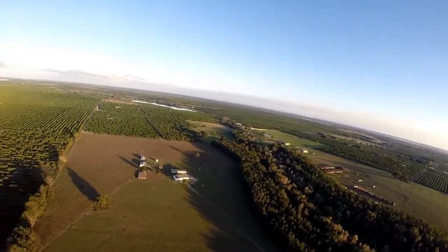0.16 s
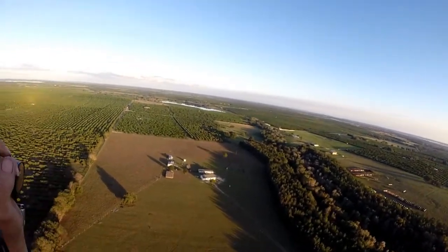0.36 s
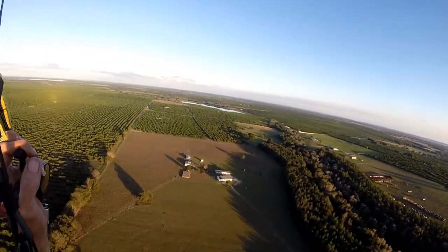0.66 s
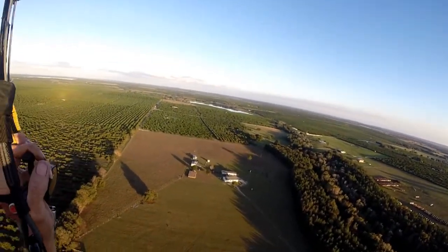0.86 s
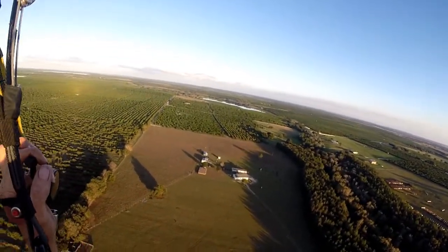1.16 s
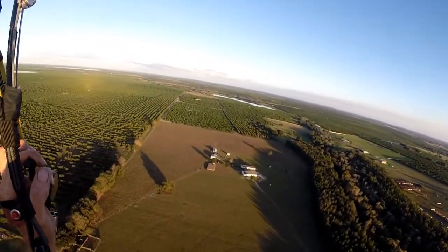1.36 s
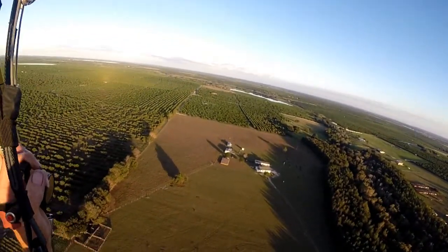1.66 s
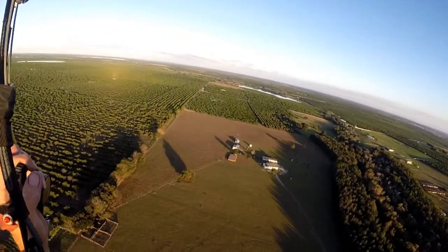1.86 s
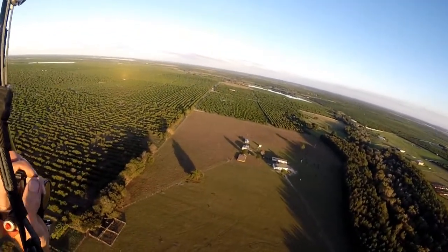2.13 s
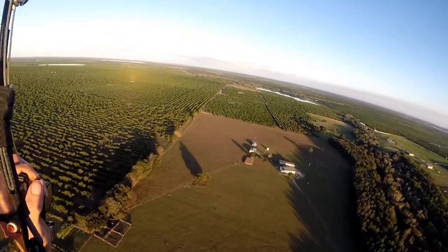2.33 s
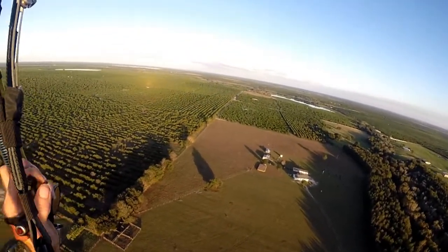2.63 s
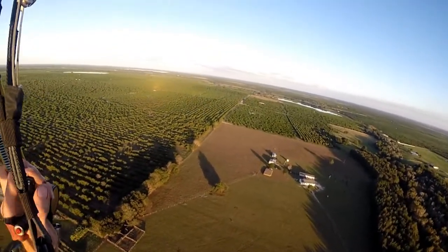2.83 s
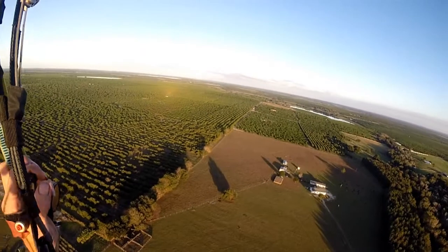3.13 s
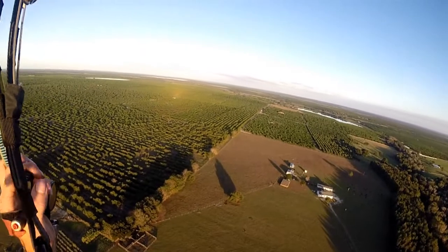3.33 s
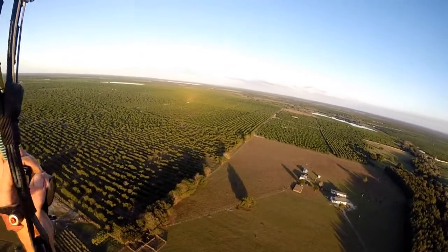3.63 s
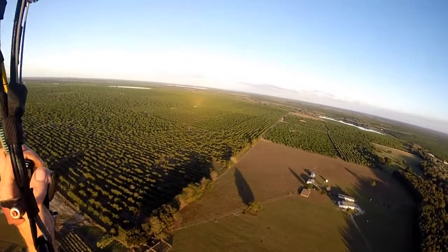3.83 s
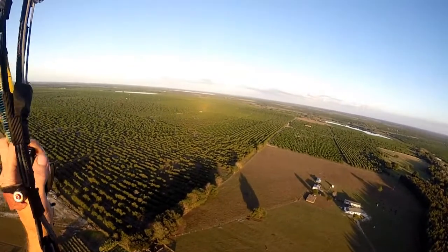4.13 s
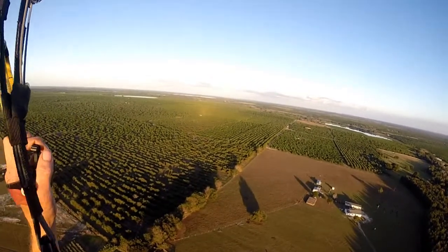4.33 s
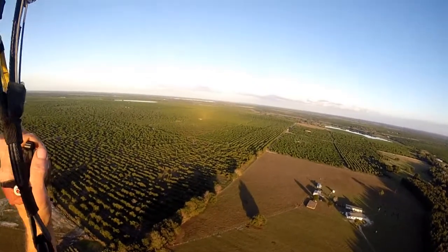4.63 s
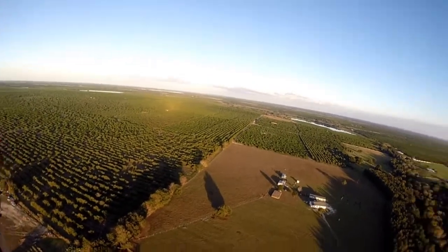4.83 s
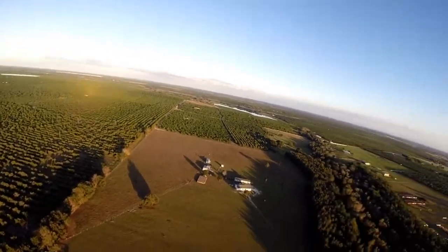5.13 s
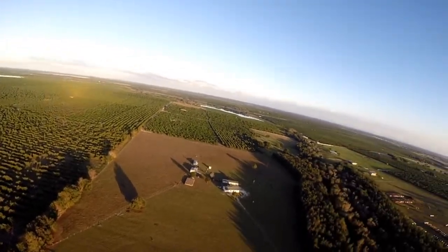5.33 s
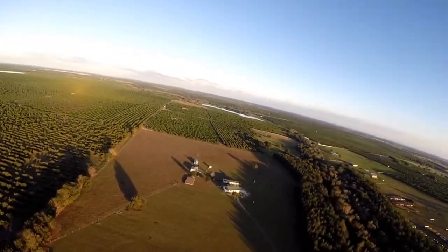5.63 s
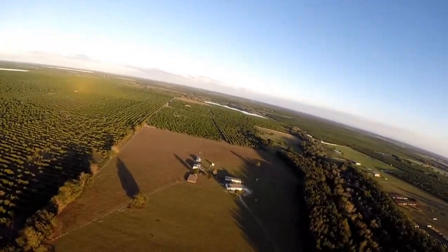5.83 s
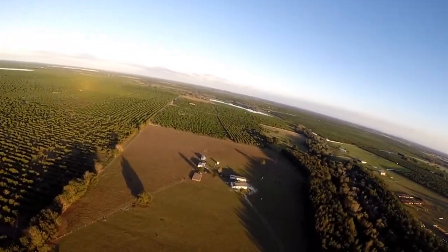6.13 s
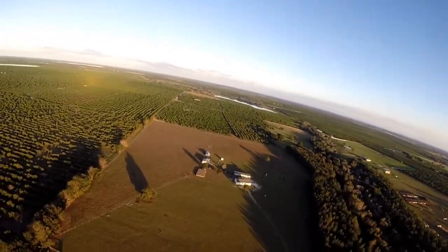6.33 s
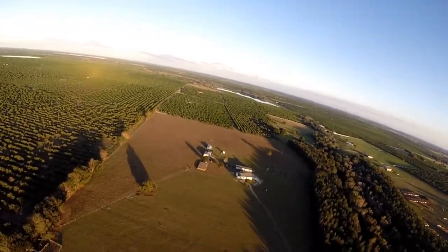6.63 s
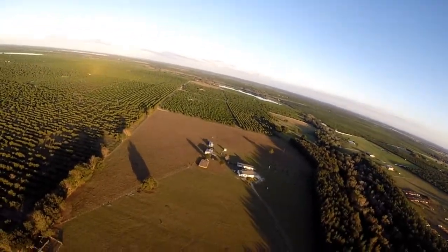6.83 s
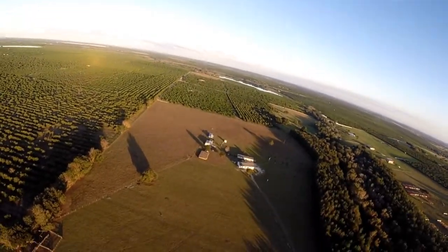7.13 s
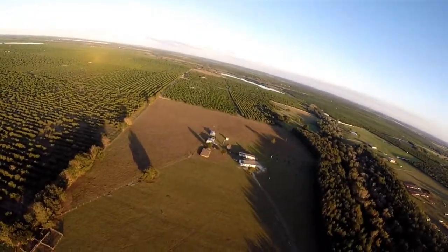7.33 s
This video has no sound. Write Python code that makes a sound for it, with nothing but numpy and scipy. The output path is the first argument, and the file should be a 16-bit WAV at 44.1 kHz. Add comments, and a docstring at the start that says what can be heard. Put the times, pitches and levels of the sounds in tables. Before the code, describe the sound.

Close, continuous paramotor drone with no echo: low throbbing hum shaken into the helmet microphone, a smeared high buzz of exhaust and blades, and rough mid-high hiss. The buzz is stronger at the start, eases for a few seconds, then grows louder after 5 seconds while the bass shaking weakens and wavers. Rapid tinny rattle fades back; soft wind lumps come and go.

```python
"""A paramotor cruises: a one-cylinder two-stroke turns a two-blade propeller through a reduction drive.
From the start, a helmet camera feels bass shaking from the frame and hears engine, blades and wind.
The head starts turned and straightens within a second, changing the balance of the tones.
A loose part ticks with the firings while an overtone swells briefly and the low wind rises and falls.
Near 5 s the ticking drops and the head turns again, until the end."""
import sys
import numpy as np
from scipy import signal
from scipy.io import wavfile
from scipy.ndimage import uniform_filter1d

SR = 44100
rng = np.random.default_rng(int(sys.argv[2]) if len(sys.argv) > 2 else 0)


def boost(x):
    """Linear amplitude factor 10**(x/20) for a level x in decibels (scalar or array-like)."""
    u = np.asarray(x, float) / 20
    return 10 ** u


def int16_out(signal):
    """Quantize to a 16-bit WAV file."""
    q = np.round(np.clip(np.atleast_2d(signal).T, -1, 1) * 32767)
    wavfile.write(sys.argv[1], SR, q.astype(np.int16))


N = 329427  # length in samples

# How far the head is turned: time_s, turned_0_to_1
HEAD_TURN = [(0, 1), (.4, 0.5), (.9, 0), (4.6, 0.06), (5.2, 0.82), (6.4, 1), (6.9, 1), (7.47, 1)]
# Engine speed: time_s, firings_hz
FIRING_SPEED = [(0.0, 114.81), (0.45, 114.31), (0.75, 114.45), (1.05, 114.33), (1.8, 114.43), (2.1, 114.6),
                (2.4, 114.61), (2.7, 114.46), (3.0, 114.61), (3.45, 114.43), (3.85, 114.08), (4.05, 114.13),
                (4.5, 114.73), (5.1, 115.24), (5.4, 115.27), (5.7, 115.03), (6.3, 114.69), (6.6, 114.28),
                (7.05, 114.71), (7.47, 115.46)]
BLADES_PER_FIRING = 5 / 9  # blade passes for each firing

# How firmly the frame shakes the helmet: time_s, firing_db, blade_db, difference_tone_db
FRAME_SHAKE = [(0.0, -25.5, -40, -31), (.35, -22, -32, -33), (.85, -19.5, -26.5, -35),
               (1.4, -20, -21.5, -36), (1.65, -21, -21.5, -34), (1.95, -21, -27, -35),
               (2.5, -19.5, -27.5, -45), (2.9, -19, -24.5, -36), (3.3, -20.2, -25.5, -37),
               (3.75, -19.5, -32, -45), (4.3, -19.5, -29, -31.5), (4.65, -19, -25, -32),
               (4.85, -24, -24, -30), (5.0, -22.5, -30, -36), (5.22, -32, -42, -50), (5.4, -27, -41, -41),
               (5.95, -25.5, -35, -37), (6.05, -22, -33, -38), (6.15, -25.5, -30, -33),
               (6.27, -18, -34, -42), (6.42, -18, -28, -38), (6.6, -25.5, -41, -36),
               (7.22, -30.5, -30.5, -40), (7.4, -26.5, -28, -34), (7.47, -27, -30, -36)]
# Brief swells of the second firing overtone: peak_s, peak_db, length_at_half_height_s
SECOND_SWELLS = [(.3, -45, 0.42), (1.5, -48, 0.34), (2.098, -47, 0.26), (2.508, -38.5, .14),
                 (2.7, -45.5, .2), (3.0, -44, 0.27), (3.397, -49, .2), (3.902, -44, 0.3),
                 (4.296, -45.5, 0.26), (5.74, -41, 0.22), (6.03, -42, .12), (6.303, -43, 0.16),
                 (6.756, -47.5, 0.28), (7.095, -45, .3)]
SECOND_REST_DB = -60.5
# Colour of the rough shaking around the low tones: pitch_hz, relative_db_per_hz
JUDDER_COLOUR = [(20, -24), (40, -10), (58, 11.5), (85, -3), (115, -2), (150, -7), (300, -46.5)]

# Level of the airborne engine and propeller sound: time_s, setting_db
AIRBORNE_LEVEL = [(0.0, -25), (.25, -23), (.75, -25.5), (1.05, -28.5), (1.5, -30.5), (2.3, -29.5),
                  (2.85, -28), (3.45, -29.5), (4.25, -26.5), (4.8, -28), (5.55, -23.5), (6.1, -22.5),
                  (6.5, -26), (7.0, -24), (7.47, -22)]
TONES_HOLD_AT_SETTING_DB = -30  # the tone tables give the levels at this setting
# Exhaust overtones: firing_multiple, head_straight_db, head_turned_db
EXHAUST_TONES = [(3, -54, -58.5), (4, -57.5, -59), (5, -57.5, -57.5), (6, -64.5, -59.5), (7, -59, -56.5),
                 (8, -50.5, -52), (9, -56.5, -58.5), (10, -42.5, -43), (11, -46.5, -56.5),
                 (12, -47.5, -47.5), (13, -41.5, -42), (14, -48, -52), (15, -48, -51), (16, -48.5, -42.5),
                 (17, -57, -51), (18, -49, -53.5), (19, -44.5, -45.5), (20, -37.5, -44.5),
                 (21, -54.5, -43.5), (22, -49.5, -46.5), (23, -62, -55.5), (25, -68.5, -59),
                 (26, -63.5, -64), (30, -65, -73), (35, -68, -70), (40, -63.5, -72)]
# Propeller overtones: blade_multiple, head_straight_db, head_turned_db
BLADE_TONES = [(2, -43.2, -49.4), (3, -60.0, -56.5), (4, -59.6, -57.9), (5, -60, -61.5), (6, -60, -70),
               (8, -54.5, -54.1), (12, -62, -70), (13, -61, -66), (14, -60.5, -63.5), (16, -57.1, -57.1),
               (17, -55.8, -54.9), (19, -56.5, -55.8), (20, -55.9, -56.7), (21, -49.8, -50.2),
               (22, -50.5, -46.9), (23, -44.6, -43.7), (24, -50.1, -48.9), (25, -55.8, -51.8),
               (26, -60.9, -50.2), (29, -56.8, -63.4), (30, -58.9, -55.5), (32, -59.1, -55.9),
               (33, -61.4, -54.1), (34, -52.8, -57.1), (35, -51.9, -55.7), (37, -46.8, -49.4),
               (38, -56.9, -56.0), (40, -52.9, -54.8), (41, -56.0, -60.5)]
# Tones of blades chopping the exhaust: firing_multiple, blade_multiple, head_straight_db, head_turned_db
CHOPPED_TONES = [(2, -1, -58.3, -60.6), (1, 1, -50.9, -62.7), (1, 2, -54.3, -60.8), (2, 1, -54.1, -66.3),
                 (11, -1, -54.9, -53.3), (13, -1, -50.4, -49.2), (13, 1, -51.9, -56.1),
                 (19, 1, -53.3, -49.9), (19, 2, -47.6, -57.3), (21, -1, -58.4, -71.3), (20, -1, -55, -56),
                 (12, 1, -59.5, -57.1)]

# Colour of the broad noise in the air: pitch_hz, relative_db_per_hz
AIR_COLOUR = [(20, -1), (200, -11), (500, -12), (800, -9.5), (1100, -4), (1450, -1), (2300, -1), (3000, -9),
              (4000, -17), (5000, -22), (6600, -21.5), (8500, -31), (11000, -31.5), (14000, -44)]
# Peaks and dips of the camera housing, head straight: pitch_hz, width_at_half_db_hz, gain_db
HOUSING_PEAKS = [(850, 80, 2.5), (975, 60, -3), (1430, 200, 3), (1760, 120, -6), (1850, 80, 3),
                 (2000, 90, -6), (2480, 200, 2), (3100, 150, -3), (3300, 200, 2.5), (3500, 150, -4),
                 (3750, 250, 4), (4100, 250, -4), (4500, 400, 3), (5100, 400, -3), (6100, 800, 4.5),
                 (6350, 200, 2), (6750, 400, -4), (7500, 600, 2), (8600, 900, -2), (9650, 200, -2),
                 (11100, 500, 1.5), (11900, 600, -4), (12700, 800, 3)]
# Share of the noise power that puffs with firings and blades: pitch_hz, share_0_to_1
PUFFING_SHARE = [(300, 0), (1400, 0.17), (2300, 0.03), (4000, 0.18), (6200, 0.32), (8000, 0.43),
                 (12000, 0.5)]

# Colour of the low wind noise: pitch_hz, relative_db_per_hz
WIND_COLOUR = [(10, -11), (30, -1.5), (100, 7.5), (150, -15), (250, -1), (330, -10.5), (600, -24.5),
               (2000, -48)]
# Chance rises and falls in the low wind noise, written as ramps: peak_s, peak_db, build_up_s
WIND_RAMPS = [(0.0, -30, .1), (.89, -34, .2), (1.69, -36, 0.5), (2.47, -35.5, .2), (2.99, -33, 0.33),
              (3.62, -36, .5), (3.74, -33, .1), (4.02, -35, .2), (5.76, -33, .15), (6.07, -30.5, .25),
              (6.36, -38, .2), (6.85, -36.5, .25), (7.4, -35.5, .6)]
CALM_DB, FALL_DB_PER_S, BUILD_DB = -44, 118, 7  # lowest level, fall rate, climb during build_up_s

# What the loose part rings with: pitch_hz, width_of_each_filter_pass_hz, relative_db
TICK_RINGS = [(10290, 210, 2.5), (9950, 400, -8), (6250, 700, 3)]
TICK_DROP_AT_S, TICK_DROP_LENGTH_S, TICK_DROP_DB = 4.95, .12, -11
# Base level, share of the airborne sound's dB changes, size of the wavering
TICK_DB, TICK_FOLLOWS_AIRBORNE, TICK_WAVER_DB = -64.5, 0.44, .4


def evened(x):
    """Scales to an rms (average strength) of 1."""
    return x / np.sqrt(np.mean(x ** 2) + 1e-20)


def curve(rows):
    """Joins the points of a time table with straight lines, one value a sample for each column."""
    s, *columns = np.transpose(rows)
    return [np.interp(np.arange(N) / SR, s, c) for c in columns]


def read(points, hz):
    """Reads a frequency table along a log-frequency axis."""
    f, value = np.transpose(points)
    return np.interp(np.log(hz + 1), np.log(f + 1), value)


def wander(count, top_hz):
    """Slow chance movement: rows of summed sines with random phases, each row scaled to a spread of 1."""
    t = np.arange(0, N + 512, 512) / SR
    f = np.geomspace(.2, top_hz, num=16)
    phase = rng.random((count, 1, len(f)))
    slow = np.sin(2 * np.pi * (f * t[:, None] + phase)) @ f ** -.5  # slower sines are stronger
    return [np.interp(np.arange(N) / SR, t, row / row.std()) for row in slow]


def puffs(turns, decay):
    """A burst of power once a turn that dies away, mean 1; decay is in turns."""
    burst = np.exp(-(turns % 1) / decay)
    return burst / burst.mean()


def shaped(x, gain, size):
    """Filters x by a gain over frequency and time."""
    frames = dict(nperseg=size, noverlap=size * 3 // 4)
    hz, _, z = signal.stft(x, SR, **frames)
    return signal.istft(z * gain(hz[:, None], z.shape), SR, **frames)[1][..., :N]


def swelling():
    """Level of the second firing overtone: a faint rest with bell-shaped swells."""
    t = np.arange(N) / SR
    swells = sum(boost(db) * np.exp(-np.log(16) * ((t - s) / length) ** 2) for s, db, length in SECOND_SWELLS)
    return 20 * np.log10(boost(SECOND_REST_DB) + swells)


def shake(fire, blade, fire_db, blade_db, difference_db, second_db):
    """The frame carries the lowest tones straight into the camera, with some judder around them."""
    a, b, c, d = wander(count=4, top_hz=10)
    firing = boost(fire_db + 0.35 * a) * np.cos(2 * np.pi * fire)
    blades = boost(blade_db + .5 * b) * np.cos(2 * np.pi * blade)
    difference = boost(difference_db + 0.72 * c) * np.cos(2 * np.pi * (fire - blade))
    second = boost(second_db + 1.2 * d) * np.cos(4 * np.pi * fire + 1.55 * c)
    lines = firing + blades - difference + second
    judder = shaped(rng.standard_normal(N), lambda hz, shape: boost(read(JUDDER_COLOUR, hz)), size=4096)
    return np.sqrt(2) * lines + boost(fire_db - 18.5) * evened(judder)  # sqrt(2): sine levels are rms


def tones(fire, blade, head):
    """Overtones of firings and blades; higher ones lag more, which smears each pulse into an even buzz."""
    rows = [(k, 0, a, b) for k, a, b in EXHAUST_TONES]
    rows += [(0, k, a, b) for k, a, b in BLADE_TONES]
    rows += list(CHOPPED_TONES)
    flutter, slip = wander(count=len(rows), top_hz=14), wander(count=len(rows), top_hz=8)
    out = np.zeros(N)
    for (m, n, straight_db, turned_db), level, phase in zip(rows, flutter, slip):
        lag = .15 * (m + 1.15 * n) ** 2  # radians
        level_db = straight_db + head * (turned_db - straight_db) + .9 * level
        out += boost(level_db) * np.cos(2 * np.pi * (m * fire + n * blade) - lag + .1 * phase)
    return np.sqrt(2) * out


def roar(fire, blade, head):
    """Steady and puffing noise pass the housing, with drifting patches; a turned head flattens the treble peaks."""
    puffing = .65 * puffs(fire + .25, decay=.22) + .3 * puffs(blade + .47, decay=.25)
    white = rng.standard_normal((2, N)) * [np.ones(N), np.sqrt(puffing)]

    def gain(hz, shape):
        share = np.clip(read(PUFFING_SHARE, hz), 0, 1)
        housing_db = sum(db * np.exp(-np.log(16) * ((hz - f) / w) ** 2) for f, w, db in HOUSING_PEAKS)
        patches = uniform_filter1d(rng.standard_normal(shape[1:]), size=14, axis=0)  # smooth over pitch
        patches = evened(uniform_filter1d(patches, size=16, axis=1))  # smooth over time
        turned = np.interp(np.linspace(0, N, shape[2]), np.arange(N), head)
        treble = np.clip(np.log2((hz + 1) / 5000), 0, 1)  # fades in from 5 to 10 kHz
        housing_db = housing_db * (1 - 0.49 * turned * treble) - 2.2 * turned * treble
        return np.sqrt([1 - share, share]) * boost(read(AIR_COLOUR, hz) + housing_db + .5 * patches)
    return boost(-33.0) * evened(shaped(white, gain, size=1024).sum(axis=0))


def wind_level():
    """Level of the low wind noise: chance rises and falls, written as ramps above a lowest level."""
    t = np.arange(N) / SR
    ramps = []
    for s, db, build in WIND_RAMPS:
        below_peak = np.maximum(BUILD_DB * (s - t) / build, FALL_DB_PER_S * (t - s))
        ramps.append(db - below_peak)
    return np.maximum(np.max(ramps, axis=0), CALM_DB)


def wind():
    """Lumpy low buffeting on the housing."""
    lumps = boost(0.71 * wander(count=1, top_hz=26.3)[0])
    low = shaped(rng.standard_normal(N), lambda hz, shape: boost(read(WIND_COLOUR, hz)), size=4096)
    return boost(wind_level()) * evened(low * lumps)


def ticking(fire, blade):
    """One sharp knock a firing, hardest when firing and blade shakes line up (once in nine firings)."""
    at = np.flatnonzero(np.diff(np.floor(fire + .25)))
    luck, late = rng.standard_normal((len(at), 2)).T
    beat = -np.cos(2 * np.pi * (2 * blade - fire))[at]
    delay = np.minimum(abs(9 * late), 60).astype(int)  # samples
    knock = np.zeros(N + 64)
    knock[at + delay] = boost(6 * beat + 1.5 * luck)
    out = np.zeros(N)
    for hz, width, db in TICK_RINGS:
        r = np.exp(-np.pi * width / SR)
        mode = [1, 0, -0.5], [1, -2 * r * np.cos(2 * np.pi * hz / SR), r * r]
        once = signal.lfilter(*mode, knock[:N])
        out += boost(db) * evened(signal.lfilter(*mode, once))  # twice: a soft-edged ring
    return out


def tick_level(airborne_db):
    """The ticking partly follows the airborne level, wavers a little and drops about 11 dB near 4.95 s."""
    dropped = np.clip((np.arange(N) / SR - TICK_DROP_AT_S) / TICK_DROP_LENGTH_S + .5, 0, 1)
    waver_db = TICK_WAVER_DB * wander(count=1, top_hz=6.6)[0]
    return TICK_DB + TICK_FOLLOWS_AIRBORNE * airborne_db + TICK_DROP_DB * dropped + waver_db


def scene():
    """Adds frame shake, airborne engine and propeller, wind and ticking."""
    airborne_db = curve(AIRBORNE_LEVEL)[0] - TONES_HOLD_AT_SETTING_DB
    head = np.clip(curve(HEAD_TURN)[0], 0, 1)
    fire = np.cumsum(curve(FIRING_SPEED)[0]) / SR + .2  # crank turns, one firing each
    blade = BLADES_PER_FIRING * fire + .69  # blade passes
    frame = shake(fire, blade, *curve(FRAME_SHAKE), swelling())
    air = boost(airborne_db) * (tones(fire, blade, head) + roar(fire, blade, head))
    ticks = boost(tick_level(airborne_db)) * ticking(fire, blade)
    return (frame + air + wind() + ticks)[None]


def band_limit(x):
    """A steep low-pass at the top of the band."""
    return signal.sosfilt(signal.butter(12, 14470, fs=SR, output="sos"), x)


def record(dry):
    """The camera cuts the treble above 13650 Hz."""
    edge = signal.firwin(255, 13650, window=("kaiser", 6), fs=SR)
    mix = signal.oaconvolve(dry, edge[None], "same")
    return band_limit(mix)


dry = scene()
out = record(dry)
int16_out(out)
```